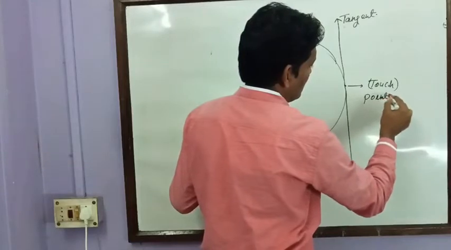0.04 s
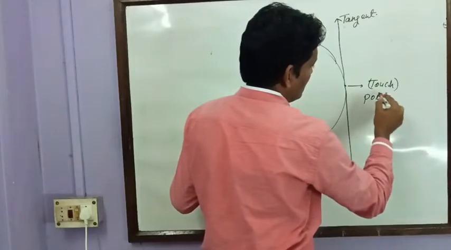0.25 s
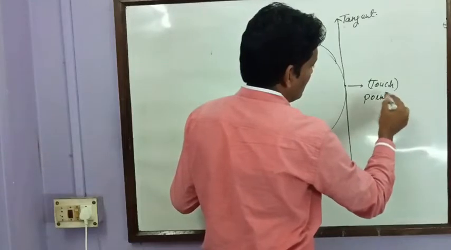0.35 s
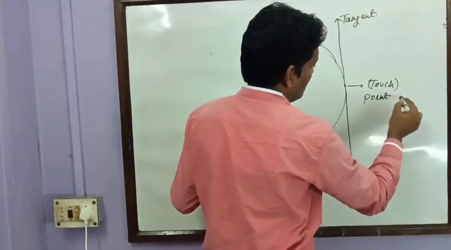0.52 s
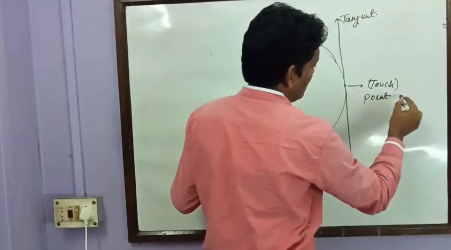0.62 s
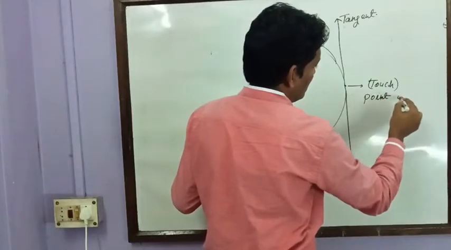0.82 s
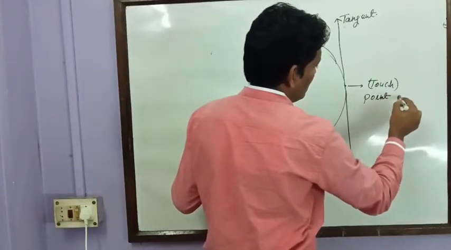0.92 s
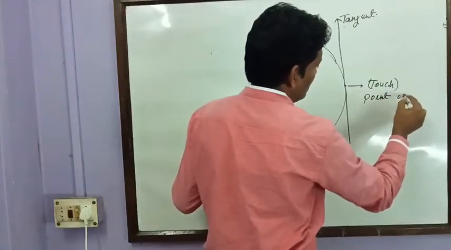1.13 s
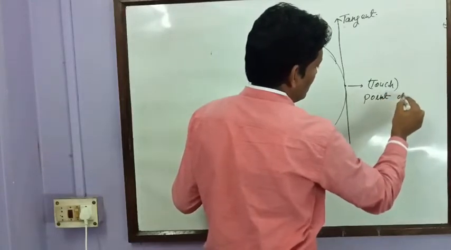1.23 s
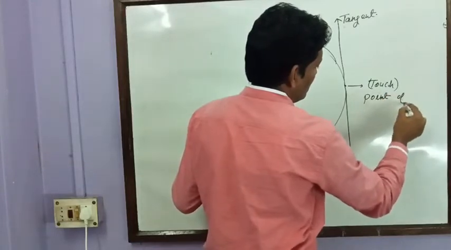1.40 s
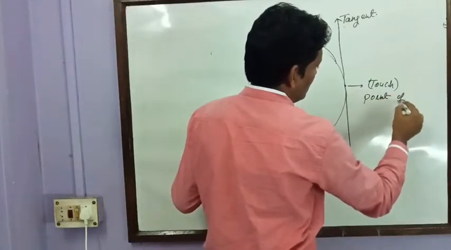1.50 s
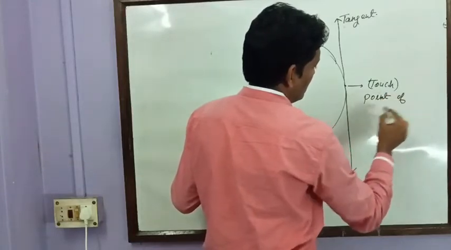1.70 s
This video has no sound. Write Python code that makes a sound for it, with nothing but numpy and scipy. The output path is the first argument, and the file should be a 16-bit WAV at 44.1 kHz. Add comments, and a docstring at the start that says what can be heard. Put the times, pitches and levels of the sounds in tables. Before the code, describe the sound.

Felt-tip marker writing on a whiteboard: fading squeak, one hollow knock, then quick dry scrapes.

```python
"""A felt-tip marker on a whiteboard in a small hard room, heard from a phone a few metres away.
First a squeak, wavering sines with a noise scrape, dies away over soft one-note bumps. Then the board is
knocked: a short push rings its modes and a noisy room tail, with dry noise ticks. Then the tip lands softly
and scrapes in short strokes: dense random fibre slips ring the tip, barrel and board, with brief rough rings,
faint knocks and more bumps. Throughout there is a fan-like rumble of wavering hums, and noise for the hiss."""
import sys
import numpy as np
from scipy import signal
from scipy.fft import rfft, irfft
from scipy.io import wavfile
from scipy.ndimage import uniform_filter1d

SR = 44100
rng = np.random.default_rng(int(sys.argv[2]) if len(sys.argv) > 2 else 0)


def generate_wav(sig):
    """Save sig (samples, or channels by samples) to the path in sys.argv[1] as 16-bit PCM at SR."""
    pcm = np.round(np.clip(np.atleast_2d(sig).T, -1, 1) * 32767).astype(np.int16)
    wavfile.write(sys.argv[1], SR, pcm)


N = 77175
T = np.arange(N) / SR  # time in seconds

# How loud the writing is over time, joined by straight lines in dB.
# Each row: time in seconds, then the levels in dB of tip hiss, barrel scrape, board scrape and board drone.
STROKE_LEVELS = [(0.62, -81, -90.5, -70, -74), (0.644, -87, -84, -81, -91), (0.67, -72, -73, -61, -40),
                 (0.692, -62, -61, -57, -69), (0.72, -61, -58, -56.5, -70), (0.748, -66, -61, -61, -46),
                 (0.774, -57, -71, -53, -85), (0.802, -57, -50, -54.5, -41), (0.818, -60, -66, -58.5, -55),
                 (0.87, -59, -56.5, -51.5, -50.5), (0.918, -63, -69, -66, -60),
                 (0.934, -77, -66, -63, -55.5), (1.026, -86, -67, -68, -62), (1.04, -87.5, -71, -65, -63),
                 (1.054, -54, -59.5, -53.5, -38.5), (1.078, -53.5, -53.5, -51, -53),
                 (1.106, -57, -57, -52.5, -58.5), (1.12, -54, -54.5, -55.5, -50),
                 (1.198, -66, -65, -59.5, -60), (1.236, -57, -62.5, -66.5, -53),
                 (1.29, -56.5, -61, -58, -65), (1.308, -57, -56.5, -59, -54),
                 (1.362, -55.5, -54.5, -57, -51.5), (1.374, -48, -51, -46.5, -56),
                 (1.394, -48, -44.5, -43.5, -42.5), (1.406, -49, -56, -52, -50.5),
                 (1.444, -57.5, -47.5, -44.5, -47), (1.468, -52.5, -61, -57, -58),
                 (1.49, -55.5, -57, -77, -67), (1.504, -66, -60, -66, -59), (1.564, -86, -69, -69, -65.5),
                 (1.614, -81, -80, -83, -74), (1.652, -83, -83, -82, -70), (1.66, -77, -82, -67, -61),
                 (1.668, -78, -58, -55, -54.5), (1.75, -78, -75, -66, -54)]
# What the slips ring: felt tip, pen barrel, board face and the low drone of the board.
# Each row of these four: pitch in Hz, width in Hz, level in dB against the other rows.
TIP_PEAKS = [(8150, 1300, -14.5), (9387, 670, 0), (9483, 558, 1), (11400, 1600, -31), (6200, 4300, -19.5)]
BARREL_PEAKS = [(3020, 1300, -3.5), (3410, 560, 3.5), (4250, 1250, -10.5), (5250, 250, -8),
                (6300, 2600, -15)]
FACE_PEAKS = [(998, 146, 5), (1174, 35, 7.5), (1372, 230, 2), (1680, 154, -3), (2020, 196, -2.5),
              (2444, 294, -1.5)]
DRONE_PEAKS = [(278, 110, 0), (371, 73, 1.5), (420, 145, -5), (568, 156, -4)]
SHARED_SLIPS = 0.51  # share of the slip power that all four parts have in common
JUDDER_DB, JUDDER_RATE_HZ = 0.5, 80


def strokes():
    """Slips, partly shared, ring the tip, barrel, board face and drone; the pressure judders."""
    common = slips()
    judder = amp(JUDDER_DB * walk(JUDDER_RATE_HZ))
    landed = T > STROKE_LEVELS[0][0]
    out = np.zeros(N)
    for column, peaks in enumerate((TIP_PEAKS, BARREL_PEAKS, FACE_PEAKS, DRONE_PEAKS), start=1):
        own = slips()
        drive = np.sqrt(SHARED_SLIPS) * common + np.sqrt(1 - SHARED_SLIPS) * own
        scrape = level(body(drive * judder, peaks), 0)
        out += scrape * amp(curve(STROKE_LEVELS, column)) * landed
    return out


SLIPS_PER_S, SLIP_SCATTER_DB = 9000, 1.5


def slips():
    """Dense random clicks of scattered size, as fibres of the tip stick and let go."""
    on = rng.random(N) < SLIPS_PER_S / SR
    size = rng.standard_normal(N) * amp(SLIP_SCATTER_DB * rng.exponential(size=N))
    return level(on * size, 0)


# Rough rings that flare within the strokes.
# Each row: start in seconds, length in seconds, pitch in Hz, width in Hz, level in dB.
FLARES = [(.773, .025, 3180, 250, -47), (0.771, 0.031, 1330, 300, -51.5), (0.798, 0.11, 3280, 90, -59.5),
          (.80, 0.13, 3460, 80, -67), (0.959, 0.027, 3120, 149, -59), (1.051, 0.057, 3570, 90, -58),
          (1.059, 0.2, 2420, 89.5, -70), (1.11, 0.038, 5300, 350, -54), (1.116, 0.039, 1446, 290, -48),
          (1.21, 0.14, 5000, 300, -64.5), (1.356, 0.062, 3320, 150, -52.5), (1.404, 0.041, 5400, 300, -57),
          (1.435, 0.027, 1540, 300, -52), (1.465, 0.045, 10800, 1500, -60.5), (1.657, .08, 873, 120, -56),
          (1.663, .03, 1500, 200, -55), (1.665, 0.017, 2570, 200, -58)]
FLARE_RISE_S = 0.0058


def whistle():
    """Slips catch one resonance for a short spell, fading out three times slower than in."""
    out = np.zeros(N)
    for start, length, hz, width, db in FLARES:
        rise = T - start
        fall = (start + length - T) / 3
        gate = np.clip(np.minimum(rise, fall) / FLARE_RISE_S, 0, 1)
        out += gate * level(body(slips(), [(hz, width, 0)]), db)
    return out


# How the squeak dies away.
# Each row: time in seconds, whistle level in dB, scrape level in dB.
SQUEAK_LEVELS = [(0, -35.5, -54), (.022, -47, -48), (.03, -44.5, -57), (.06, -49.5, -60), (.068, -66, -66),
                 (.084, -64, -60), (.09, -54, -71), (.104, -59, -65), (.112, -66, -62), (.135, -73, -62.5),
                 (.152, -62, -63.5), (.162, -77, -74), (.2, -81, -80)]
# The lines of the whistle. Each row: pitch in Hz, level in dB against the other rows.
SQUEAK_PITCHES = [(3178, 0), (3105, -9), (3010, -18)]
SQUEAK_WOBBLE, SQUEAK_FLUTTER_DB, SQUEAK_RATE_HZ = 0.005, 2.5, 130  # wobble is a fraction of the pitch
SQUEAK_TREBLE_DB = -8  # bright part of the scrape against the low part


def squeak():
    """A narrow whistle of wavering sines and a scrape of noise through the pen and board."""
    lines = np.zeros(N)
    for hz, db in SQUEAK_PITCHES:
        lines += amp(db) * tone(hz, SQUEAK_WOBBLE, SQUEAK_FLUTTER_DB, SQUEAK_RATE_HZ)
    noise = rng.standard_normal(N)
    low = level(body(noise, DRONE_PEAKS + FACE_PEAKS), 0)
    bright = level(body(noise, BARREL_PEAKS + TIP_PEAKS), SQUEAK_TREBLE_DB)
    out = lines * amp(curve(SQUEAK_LEVELS, 1)) + (low + bright) * amp(curve(SQUEAK_LEVELS, 2))
    return out * (T < SQUEAK_LEVELS[-1][0])


# Blows on the board, one loud and the rest faint.
# Each row: start in seconds, peak level in dB, contact time in milliseconds.
BLOWS = [(0.226, -5.5, 0.35), (0.661, -34.5, 1), (1.047, -35, 1)]
# Ways the board rings. Each row: pitch in Hz, level in dB against the other rows,
# time to fall by 60 dB in seconds.
BOARD_MODES = [(124.3, -19.5, 0.13), (185, -51, 0.033), (246.9, -22, 0.2), (365, -1, 0.086),
               (420, 11.5, 0.019), (497, -27, 0.082), (629, -7, .04), (867, -1, 0.026), (1176, -22.5, .04),
               (1417, -24, 0.031), (1690, -27, 0.044), (2050, -33, 0.077), (2330, -31, 0.052)]
# Bands of the room that ring on after a blow. Each row: pitch in Hz, width in Hz,
# level in dB within the tail, time to fall by 60 dB in seconds.
ROOM_BANDS = [(138, 22, -18, 0.52), (237, 45, -11.5, 0.42), (338, 41, -6, 0.41), (420, 65, -7, 0.45),
              (512, 33, -13.5, 0.56), (558, 14, -9, 0.37), (606, 120, -5, 0.2), (780, 160, -20, 0.44),
              (905, 50, -19.5, 0.33), (1240, 270, -23.5, 0.34), (1710, 530, -50, 0.2),
              (2300, 1600, -51, 0.33)]
# The one clear note in the tail: pitch in Hz, level in dB within the tail, time to fall by 60 dB in seconds.
CLEAR_NOTE = (437, 0.69, 0.31)
TAIL_DB, TAIL_RISE_S, TAIL_LATE_S = -15.5, 0.0076, 0.014  # dB against the peak of the board ring
BOARD_RISE_S, BOARD_LOW_HZ = 0.0022, 90


def knocks():
    """A short push rings the board; a dense room tail swells in a little later."""
    out, t = np.zeros(N), T[:SR // 2]
    board = ring(BOARD_MODES) * (1 - np.exp(-t / BOARD_RISE_S)) ** 2
    board = board / np.abs(board).max()
    low_cut = signal.butter(2, BOARD_LOW_HZ, "high", fs=SR)
    swell = 1 - np.exp(-np.clip(t - TAIL_LATE_S, 0, None) / TAIL_RISE_S)
    for start, db, contact_ms in BLOWS:
        # a smooth bump whose spread is a quarter of the contact time
        push = np.exp(-.5 * ((T[:300] - .0006) / (contact_ms / 4000)) ** 2)
        tail = ring([CLEAR_NOTE])
        for hz, width, band_db, t60 in ROOM_BANDS:
            noise = band(band(rng.standard_normal(SR), hz, width), hz, 2 * width)
            # keep the second half, once the filter has settled
            tail += level(noise, band_db)[-len(t):] * fade(t, t60)
        response = board + amp(TAIL_DB) * tail * swell
        blow = signal.fftconvolve(response, push / push.sum())
        blow = signal.lfilter(*low_cut, blow)
        add(out, start, amp(db) * blow / np.abs(blow).max())
    return out


# Faint dry ticks. Each row: start in seconds, level in dB of the middle part as the tick begins.
TICK_STARTS = [(.227, -45.5), (0.277, -48.5)]
TICK_T60_S, TICK_HZ, TICK_WIDTH_HZ = 0.04, 2000, 700
TICK_TREBLE_DB = -18  # treble against the middle part


def ticks():
    """Short noise cracks: a strong middle band with a little treble, quickly fading."""
    out, t = np.zeros(N), T[:SR // 8]
    for start, db in TICK_STARTS:
        noise = rng.standard_normal(len(t))
        treble = level(body(noise, BARREL_PEAKS + TIP_PEAKS), TICK_TREBLE_DB)
        middle = level(band(noise, TICK_HZ, TICK_WIDTH_HZ), 0)
        add(out, start, amp(db) * (treble + middle) * fade(t, TICK_T60_S))
    return out


# Soft bumps, nearly all low. Each row: start in seconds, level in dB before the rise and fade,
# pitch in Hz, time to fall by 60 dB in seconds.
SOFT_BUMPS = [(.087, -33, 276, 0.092), (0.116, -33.5, 252, 0.055), (0.147, -37, 274, 0.21),
              (1.047, -33, 151, 0.083), (1.306, -32, 297.7, 0.15), (1.345, -32, 281, 0.087),
              (1.664, -52, 890, 0.072)]
BUMP_RISE_S = 0.0015


def bumps():
    """Soft thuds, each a single fading sine with a rounded start."""
    out, t = np.zeros(N), T[:SR // 2]
    for start, db, hz, t60 in SOFT_BUMPS:
        add(out, start, ring([(hz, db, t60)]) * (1 - np.exp(-t / BUMP_RISE_S)))
    return out


ROOM_T60_S, ROOM_DB, ROOM_DAMP_HZ = 0.3, -13.5, 4000


def room(x):
    """Echoes too dense to tell apart, as fading noise that is duller in the treble."""
    t = T[:SR // 2]
    tail = rng.standard_normal(len(t)) * fade(t, ROOM_T60_S) * (t > .008)
    tail = signal.lfilter(*signal.butter(1, ROOM_DAMP_HZ, fs=SR), tail)
    tail = tail / np.sqrt(np.sum(tail ** 2))
    return amp(ROOM_DB) * signal.fftconvolve(x, tail)[:N]


# Colour of the steady noise. Each row: frequency in Hz, level per Hz in dB against the other rows.
NOISE_COLOUR = [(26, -29), (45, -9), (141, -4.5), (172, -4.5), (209, -6), (287, -10.5), (309, -16),
                (434, -13), (503, -26.5), (541, -16), (707, -25.5), (880, -22), (995, -27), (2980, -30),
                (15200, -40)]
NOISE_DB = -50
# Hums made of narrow noise. Each row: pitch in Hz, width in Hz, level in dB.
NOISE_HUMS = [(141, 60, -69.5), (200.5, 5.9, -55)]
# The two deep hums of the rumble: their pitches in Hz.
RUMBLE_PITCHES = [53.3, 92.6]
# How the rumble swells. Each row: time in seconds, level in dB of the first hum, then of the second.
RUMBLE_LEVELS = [(0.0, -63, -58.5), (0.154, -64, -52.5), (0.258, -58, -56), (0.56, -67, -64.5),
                 (0.686, -65, -54), (0.808, -59, -55.5), (0.896, -54, -56), (0.988, -49, -54),
                 (1.042, -50, -51), (1.168, -57, -69), (1.428, -60, -60), (1.534, -59, -61),
                 (1.68, -61, -61), (1.75, -64, -62)]
RUMBLE_WOBBLE, RUMBLE_FLUTTER_DB, RUMBLE_RATE_HZ = 0.06, 2, 10.7  # wobble is a fraction of the pitch


def background():
    """Broad room noise and hiss, wavering hums of narrow noise, a deep rumble that swells."""
    hz_bins = np.maximum(np.arange(N // 2 + 1) * SR / N, 1)
    colour = np.array(NOISE_COLOUR)
    shape = amp(np.interp(np.log(hz_bins), np.log(colour[:, 0]), colour[:, 1]))
    shape *= np.minimum(hz_bins / 45, 1) ** 4  # little below 45 Hz
    out = level(irfft(rfft(rng.standard_normal(N)) * shape, N), NOISE_DB)
    for hz, width, db in NOISE_HUMS:
        out += level(band(band(rng.standard_normal(N), hz, width), hz, width), db)
    for column, hz in enumerate(RUMBLE_PITCHES, start=1):
        hum = tone(hz, RUMBLE_WOBBLE, RUMBLE_FLUTTER_DB, RUMBLE_RATE_HZ)
        out += hum * amp(curve(RUMBLE_LEVELS, column))
    return out


def tone(hz, wobble, flutter_db, rate):
    """A sine that wavers in pitch and level."""
    phase = 2 * np.pi * np.cumsum(hz * (1 + wobble * walk(rate))) / SR
    wave = np.sin(phase + rng.uniform(0, 2 * np.pi))
    return level(wave * amp(flutter_db * walk(rate)), 0)


def walk(rate):
    """Smooth random wander of spread 1, from noise averaged twice."""
    k = int(SR / rate)
    wander = uniform_filter1d(uniform_filter1d(rng.standard_normal(N), k), k)
    return wander / wander.std()


def band(x, hz, width):
    """Two-pole resonance, gain 1 at the centre."""
    return signal.lfilter(*signal.iirpeak(hz, hz / width, fs=SR), x)


def body(x, peaks):
    """Sum of steep resonances, every second one flipped in sign."""
    out = 0
    for k, (hz, width, db) in enumerate(peaks):
        out = out + (-1) ** k * amp(db) * band(band(x, hz, width), hz, 3 * width)
    return out


def ring(modes):
    """Fading sines, the answer of a solid thing to one sharp tap."""
    t = T[:SR // 2]
    return sum(amp(db) * np.sin(2 * np.pi * hz * t) * fade(t, t60) for hz, db, t60 in modes)


def fade(t, t60):
    """Decay that falls by 60 dB in t60 seconds."""
    return np.exp(-np.log(1000) * t / t60)


def amp(db):
    """Turn dB into a plain factor."""
    return 10 ** (np.asarray(db) / 20)


def level(x, db):
    """Scale a sound to an average (RMS) level in dB."""
    return x * amp(db) / np.sqrt(np.mean(x ** 2))


def curve(rows, column):
    """One column of a table along time."""
    rows = np.array(rows)
    return np.interp(T, rows[:, 0], rows[:, column])


def add(out, start, x):
    """Mix a sound in at a start time in seconds."""
    i = int(start * SR)
    out[i:i + len(x)] += x[:N - i]


def scene():
    """Sum all layers; only the pen goes through the shared room tail."""
    pen = strokes() + whistle()
    blows = knocks() + ticks() + bumps()
    return (pen + room(pen) + squeak() + blows + background())[None]


TOP_HZ = 15450


def record(dry):
    """The phone cuts the top with a steep low-pass."""
    return signal.sosfilt(signal.ellip(14, .3, 70, TOP_HZ, fs=SR, output="sos"), dry)


dry = scene()
out = record(dry)
generate_wav(out)
```